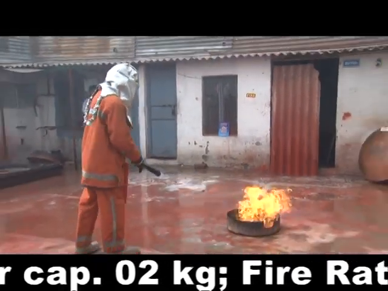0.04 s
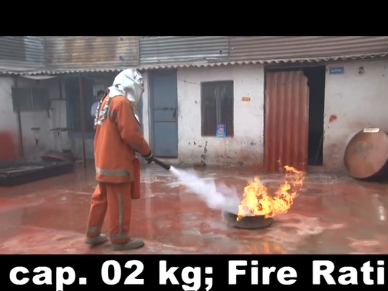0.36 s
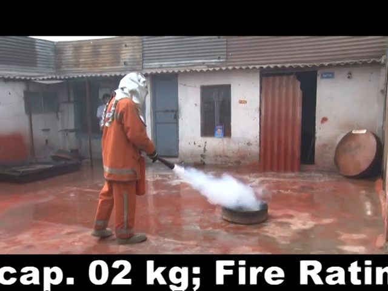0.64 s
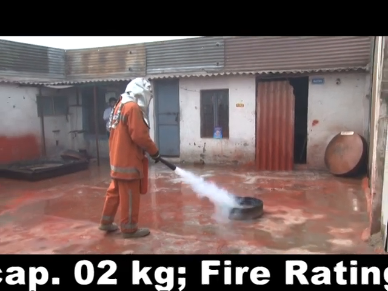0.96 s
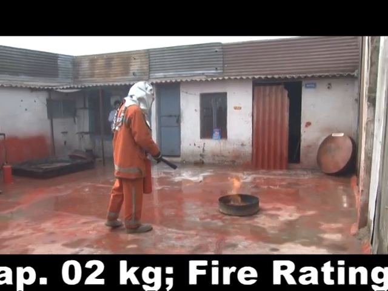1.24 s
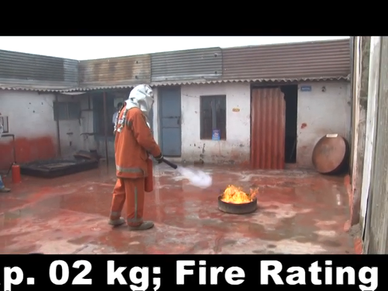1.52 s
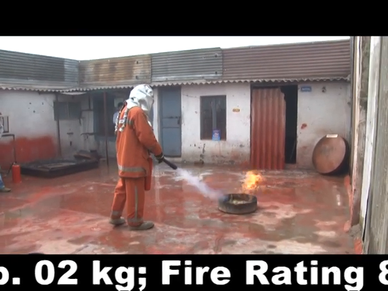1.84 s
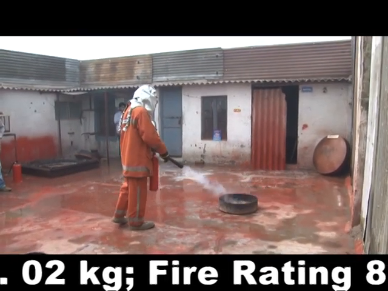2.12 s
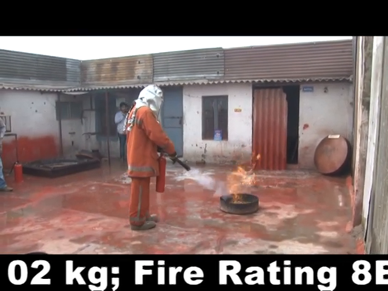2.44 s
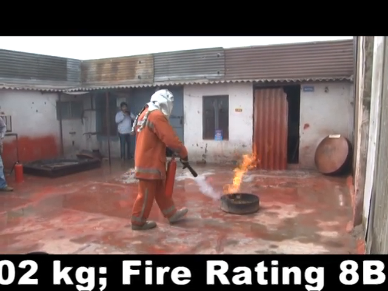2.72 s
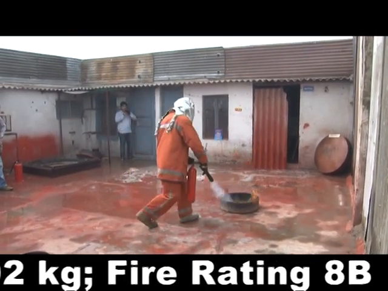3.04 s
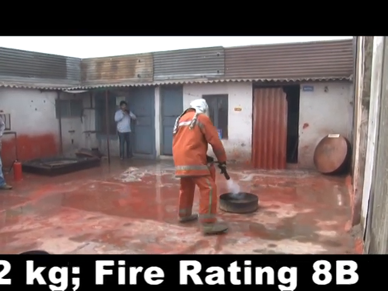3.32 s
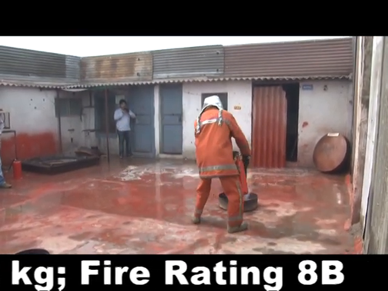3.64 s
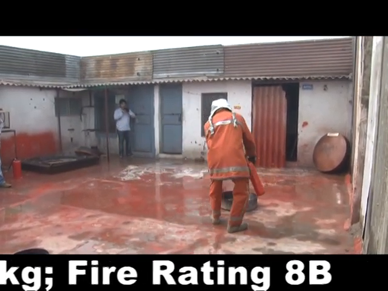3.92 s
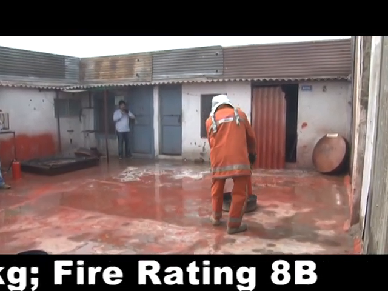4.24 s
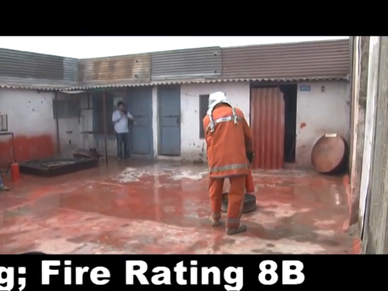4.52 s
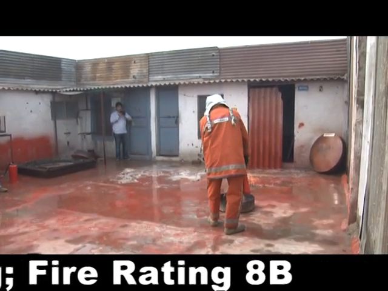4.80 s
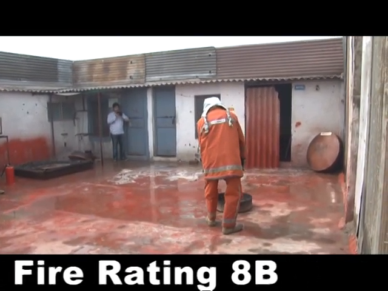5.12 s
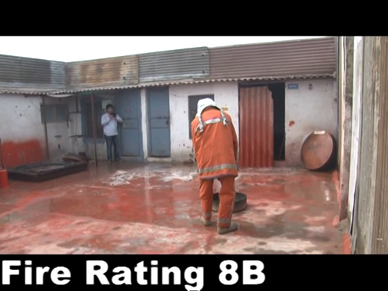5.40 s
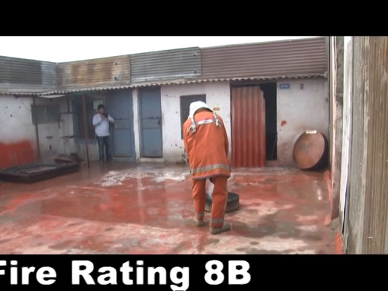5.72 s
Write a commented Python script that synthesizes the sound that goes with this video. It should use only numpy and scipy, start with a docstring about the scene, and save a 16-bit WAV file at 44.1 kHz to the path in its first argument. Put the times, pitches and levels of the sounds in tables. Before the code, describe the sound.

A fire extinguisher's hissing burst dies away with a small lever tick. A second burst roars and booms into a burning pan, stopping as the flames softly flare. Sharp snaps of dry ice surround the start of one long blast, which howls, sputters and then thins to a steady hiss with a deep, hollow thrum beneath. The sound stands near the centre, with a short echo from a walled yard.

```python
"""A carbon dioxide extinguisher is emptied onto a burning pan in a walled yard that echoes. A first burst
dies away and the lever ticks. A second burst roars through the horn and booms in the pan; the flames
rumble under it and flare up when it stops. Lumps of dry ice snap out as one long blast begins. The jet
howls for about a second and sputters, then thins from snow to a hiss of plain gas, while a deep thrum
grows as the horn is brought close to the pan."""
import sys
import numpy as np
from scipy import signal
from scipy.fft import rfft, irfft, next_fast_len
from scipy.io import wavfile
from scipy.ndimage import map_coordinates

SR = 44100
rng = np.random.default_rng(int(sys.argv[2]) if len(sys.argv) > 2 else 0)


def put_to_file(sound):
    """Save the sound as 16-bit audio at rate SR, in the file named by the first command-line argument."""
    columns = np.atleast_2d(sound).T  # one column per channel
    safe = np.clip(columns, -1, 1)
    whole_steps = np.round(safe * 32767)
    wavfile.write(sys.argv[1], SR, whole_steps.astype(np.int16))


N = 262836
LEAD = SR // 3  # extra samples before time zero: the first burst is already under way
TIME = np.arange(-LEAD, N) / SR
M = len(TIME)

# squeezes of the lever: open_s, shut_s, level_db, closing_s
BURSTS = [(-.3, .0, -2, .025), (.329, 1.19, 0, .005), (1.586, 6.5, 0, .005)]
# brief surges of the flow: time_s, gain_db, half_length_s
SURGES = [(0.335, 7, 0.0085), (0.368, 5, 0.0072), (0.583, 3.5, 0.0062), (1.19, 2.5, 0.0096),
          (1.592, 8, 0.015)]
# the liquid runs out and the jet turns from snow to gas: start_s, end_s
EMPTYING_S = (1.28, 3.413)
# resonances of the snowy horn, the gas-filled horn and the pan: pitch_hz, width_hz, lift_db
SNOW_RESONANCES = [(632, 112, 15.5), (858, 81, 9), (1141.7, 75.6, 9.5), (1280.2, 76.6, 11), (1456, 98, 7.5),
                   (1835, 220, 12), (2090.6, 37, 9), (2396, 130, 9), (2660, 68, 5), (2861, 170, 6)]
GAS_RESONANCES = [(634.7, 95, 19.1), (1045, 132, 12.9), (1433, 204, 11.68), (1828, 170, 7.4),
                  (2330, 402, 4.7)]
PAN_RESONANCES = [(461, 58, 14), (663, 149, 17), (1150, 110, 13), (1824, 120, 15), (2300, 160, 16.5)]
# tone colour of the roar in each of those three: pitch_hz, level_db
SNOW_ROAR = [(100, -22), (220, -22.5), (380, -12.5), (520, -9.5), (1000, -7), (2000, -2.5), (3000, 1),
             (4000, -1.5), (7000, -37)]
GAS_ROAR = [(100, -36), (200, -27.5), (450, -22.5), (850, -14.5), (1250, -11.5), (2000, -3), (2800, 0.5),
            (4000, -7), (7000, -55.5)]
PAN_ROAR = [(250, -15), (450, -4), (2400, 0), (3500, -36)]
# the lowest gas resonance fades for a moment: time_s, half_length_s, share_lost
NOTE_FADE = (3.62, 0.39, 0.76)
# tone colour of the jet's hiss, finest spray and deep thrum: pitch_hz, level_db
HISS_COLOUR = [(1000, -37.5), (2400, -7.5), (3500, 0), (4300, 1), (5600, 0), (6600, -4.5), (8000, -12.5),
               (12000, -54)]
SIZZLE_COLOUR = [(3500, -57), (6000, 1.5), (7200, 0.5), (8800, 0), (10000, -5.5), (12000, -13),
                 (13800, -20), (14500, -27.5)]
THRUM_COLOUR = [(150, -35), (215, -9.5), (255, 0), (295, -2), (345, -17.5), (480, -39)]
# the jet brightens as the last liquid leaves: time_s, half_length_s, hiss_db, sizzle_db
CREST = (2.42, 0.438, 1.24, 3.82)
# short swells of the hiss: time_s, gain_db
SPUTTERS = [(2.29, 1), (2.44, 3.5), (2.6, 3.5), (2.69, 5.5), (2.8, 4.5)]
# the horn is swung about: time_s, half_length_s, sizzle_db, roar_db
SWINGS = [(.02, 0.096, -10.5, 4.5), (0.425, 0.089, 3, 0.5), (0.667, 0.0772, -16, 0), (0.884, 0.1, 2, -1.5),
          (1.095, 0.13, -5, 2), (3.188, 0.32, 0, 2.5), (3.897, 0.35, -1.7, -0.93)]
# the jet locks onto a note of the horn: start_s, end_s
HOWL_LOCKS = [(1.768, 1.909), (2.003, 2), (2.1, 2.215), (2.265, 2.3)]
# the note hovers loosely all through this time: start_s, end_s
HOWL_SPAN_S = (1.68, 2.587)
# whistles at the mouth of the horn: time_s, half_length_s, pitch_hz, width_hz, level_db
WHISTLES = [(0.335, 0.023, 2600, 800, -19.5), (0.66, 0.17, 2320, 110, -27), (2.231, 0.33, 1840, 94, -29),
            (2.627, 0.11, 4160, 650, -20), (2.68, 0.276, 5440, 300, -26), (3.097, 0.099, 1830, 111, -26.5),
            (4.238, 0.16, 1845, 130, -29.5)]
# the jet aimed straight into the pan: start_s, end_s, level_db, rise_s, fall_s
INTO_PAN = (0.62, 0.8284, -20, 0.16, 0.0045)
# the horn is carried up to the pan: start_s, end_s
WALK_S = (2.04, 4.0)
# lumps of dry ice leaving the horn: start_s, snap_db, crack_db, decay_s
ICE_LUMPS = [(1.339, -14.5, -26.5, 0.0057), (1.361, -35.5, -54, 0.053), (1.559, -8, -18, 0.0072),
             (1.796, -7, -26, 0.0045), (2.046, -9, -16, 0.0066)]
# the lever hits its stop: start_s, level_db
LEVER_TICK = (.126, -36)
# the jet blows the flames about: start_s, end_s, level_db
FLARES = [(.08, 0.178, -35), (0.513, .88, -35), (1.025, 1.17, -33), (1.736, 2.244, -41.5)]
# the fuel catches again: start_s, level_db, decay_s
FLARE_UP = (1.26, -33, 0.055)
# tone colour of the fire and of the outdoor air: pitch_hz, level_db
FIRE_COLOUR = [(15, -27), (35, 1), (60, 4.5), (105, 7.5), (150, 2.5), (205, -10), (275, -3.5), (500, -36.5)]
AIR_COLOUR = [(30, -18), (120, -8), (300, 1.5), (700, -2), (1800, -9.5), (4000, -21.5), (8000, -34),
              (13000, -65)]
# how long the echo takes to fall by 60 dB: pitch_hz, decay_s
ECHO_DECAY = [(150, 0.68), (600, 0.6), (2000, 0.491), (4500, 0.453), (9000, 0.31), (14000, 0.288)]
# where the jet stands: time_s, left_minus_right_db
JET_PLACE = [(.35, -1.2), (.75, 0.12), (1.75, 1.6), (2.25, -0.8), (3.2, .1), (3.75, -1.3), (5.8, -.3)]
# how alike left and right are: pitch_hz, likeness (1 is identical)
STEREO_LIKENESS = [(100, 0.935), (650, 0.9), (950, 0.59), (1500, 0.538), (2100, 0.64), (2900, 0.665),
                   (3900, 0.722), (6000, 0.79), (7600, .6), (9000, 0.88), (11500, 0.99)]
# which side is louder: pitch_hz, left_minus_right_db
STEREO_LEAN = [(600, -0.2), (950, 3.5), (1800, 0.2), (2900, 1), (4000, -1), (7000, 0.2), (8200, -1.5),
               (11000, 0)]
# which side is ahead: pitch_hz, left_lead_radians
STEREO_PHASE = [(0, 0), (1030, 0.26), (1290, 0.8), (1810, 0.53), (2330, -0.64), (2840, -0.67), (4130, 0.32),
                (4570, -0.38), (7240, -0.41), (7580, -0.82), (8270, -0.25), (9220, -0.77), (10400, -0.0),
                (14300, -0.0)]


def jet():
    """Large swirls roar in the horn, small ones hiss and sizzle at its mouth; all flutter together."""
    hiss_db, sizzle_db = treble_levels()
    _, roar_swing_db = swings()
    roar = amp(roar_swing_db + 0.425 * wobble(40)) * horn()
    hiss = amp(hiss_db + 0.71 * wobble(35)) * rush(HISS_COLOUR)
    sizzle = amp(sizzle_db + 0.87 * wobble(50)) * rush(SIZZLE_COLOUR)
    flutter = amp(0.51 * wobble(21.98) + 0.84 * wobble(140))
    return valve() * flutter * (roar + hiss + sizzle + pan() + thrum() + whistles())


def valve(opening_s=0.0046):
    """The valve opens within milliseconds, and the flow surges when liquid reaches the nozzle."""
    flow = 0
    for open_s, shut_s, db, closing_s in BURSTS:
        opened = .5 + .5 * np.tanh((TIME - open_s) / (2 * opening_s))
        flow += amp(db) * opened * np.exp(-np.maximum(TIME - shut_s, 0) / closing_s)
    return flow * amp(sum(db * bell(s, half) for s, db, half in SURGES))


def horn(snow_db=-18, gas_db=-22):
    """Rushing gas rings the horn, whose resonances change as the snow in it clears."""
    snow = np.interp(TIME, EMPTYING_S, (1, 0)) ** 1.8  # clears quickly at first
    time_s, half_s, share_lost = NOTE_FADE
    faded = share_lost * bell(time_s, half_s)
    gas_roar = np.sqrt(1 - faded) * rush(GAS_ROAR, GAS_RESONANCES)
    gas_roar += np.sqrt(faded) * rush(GAS_ROAR, GAS_RESONANCES[1:])
    snow_roar = rush(SNOW_ROAR, SNOW_RESONANCES)
    return amp(snow_db) * np.sqrt(snow) * snow_roar + amp(gas_db) * np.sqrt(1 - snow) * gas_roar


def treble_levels(hiss_sag_db_per_s=0.38, sizzle_sag_db_per_s=3):
    """Hiss and sizzle in dB: they grow as snow turns to gas, then sag as the pressure falls."""
    gas = np.interp(TIME, EMPTYING_S, (0, 1))
    gas_only_s = np.maximum(TIME - EMPTYING_S[1], 0)
    crest_s, half_s, crest_hiss_db, crest_sizzle_db = CREST
    crest = bell(crest_s, half_s)
    swing_db, _ = swings()
    sputter_db = sum(db * bell(s, half_s=0.038) for s, db in SPUTTERS)
    hiss_db = blend(-21.5, -17.5, gas) + crest_hiss_db * crest - hiss_sag_db_per_s * gas_only_s
    sizzle_db = blend(-27, -21.5, gas) + crest_sizzle_db * crest - sizzle_sag_db_per_s * gas_only_s
    return hiss_db + 0.44 * swing_db + sputter_db, sizzle_db + swing_db + .4 * sputter_db


def swings():
    """How much the sizzle and the roar change, in dB, as the horn turns."""
    shapes = np.array([bell(s, half) for s, half, _, _ in SWINGS])
    return np.transpose(SWINGS)[2:] @ shapes


def howl(pitch_hz=563, rise_hz_per_s=67, loose_db=-32, locked_db=-21.5):
    """A note of the horn rises as the snow thins, louder and steadier when the jet locks onto it."""
    lock = np.max([held(start, end, rise_s=0.0096, fall_s=0.013) for start, end in HOWL_LOCKS], axis=0)
    hz = pitch_hz + rise_hz_per_s * (TIME - HOWL_SPAN_S[0])
    waver_hz = blend(34, 6, lock) * wobble(110)
    phase = 2 * np.pi * np.cumsum(hz + waver_hz) / SR
    level = held(*HOWL_SPAN_S, rise_s=0.034, fall_s=0.18) * amp(blend(loose_db, locked_db, lock))
    flutter = amp(blend(4.5, 2.6, lock) * np.tanh(wobble(80)) + wobble(90))
    overtone = amp(-20 + 4 * wobble(60)) * np.sin(3 * phase)
    return level * np.sqrt(2) * (flutter * np.sin(phase) + overtone)


def whistles():
    """Each breathy whistle is a narrow band of rushing noise that swells and fades."""
    sound = 0
    for s, half, pitch, width, db in WHISTLES:
        band = filtered(rng.standard_normal(M), lambda hz: 1 / (1 + (2 * (hz - pitch) / width) ** 4))
        sound += amp(db) * bell(s, half) * unit(band)
    return sound


def pan():
    """The pan booms while the jet blows into it."""
    start, end, db, rise, fall = INTO_PAN
    return amp(db) * held(start, end, rise, fall) * rush(PAN_ROAR, PAN_RESONANCES)


def thrum(far_db=-50, near_db=-43):
    """A deep, hollow note under the hiss grows as the horn nears the pan."""
    return amp(np.interp(TIME, WALK_S, (far_db, near_db))) * rush(THRUM_COLOUR)


def dry_ice(bounce_s=.0068):
    """Each lump leaves with a hollow snap and a thin crack, echoed by the wet ground."""
    snaps = 0
    for s, snap_db, crack_db, decay_s in ICE_LUMPS:
        snaps += amp(snap_db) * puff(s, decay_s, band_hz=(815, 1910))
        snaps += amp(crack_db) * puff(s, decay_s, band_hz=(2300, 6700))
    return snaps + amp(-7) * np.interp(TIME - bounce_s, TIME, snaps)


def lever():
    """The released lever ticks against its stop."""
    start_s, db = LEVER_TICK
    return amp(db) * puff(start_s, decay_s=0.0027, band_hz=(1500, 8100))


def flames(draught_db=-57.5, growth_db_per_s=1.23):
    """The fire rumbles in the jet and the stirred air, and catches again with a soft whoomp."""
    flares = np.max([amp(db) * held(start, end, rise_s=0.05, fall_s=0.201)
                     for start, end, db in FLARES], axis=0)
    draught = amp(draught_db + growth_db_per_s * TIME)
    rumble = np.hypot(flares, draught) * amp(2.1 * wobble(12)) * rush(FIRE_COLOUR)
    start_s, whoomp_db, decay_s = FLARE_UP
    return rumble + amp(whoomp_db) * puff(start_s, decay_s, band_hz=(170, 440))


def yard(sound, stretch=SR // 4):
    """The horn keeps moving, so each stretch of its sound gets a new echo from the walls."""
    echoes = np.zeros((2, M + SR))
    for start in range(0, M, stretch):
        echo = signal.fftconvolve(sound[None, start:start + stretch], wall_echo(), axes=1)
        echoes[:, start:start + echo.shape[1]] += echo
    return echoes[:, :M]


def wall_echo(build_up_s=0.003):
    """One blurred answer of the walls; its treble dies first."""
    hz, t, spectrum = signal.stft(rng.standard_normal((2, SR // 2)), SR, nperseg=256)
    decay = amp(-60 * t / along(ECHO_DECAY, hz)[:, None]) * np.clip(t / build_up_s, 0, 1)
    pair = spread(signal.istft(spectrum * decay, SR, nperseg=256)[1])
    return pair / np.linalg.norm(pair[0])


def outdoor_air():
    """A faint, low, steady rush fills the yard."""
    return amp(-46) * rush(AIR_COLOUR)


def stereo_tint(sound):
    """Make left and right differ slightly in tone colour and timing."""
    sides = np.array([[.5], [-.5]])
    lean = lambda hz: amp(sides * along(STEREO_LEAN, hz))
    return filtered(sound, lambda hz: lean(hz) * np.exp(1j * sides * along(STEREO_PHASE, hz)))


def rush(colour, resonances=()):
    """Stereo rushing noise of strength 1, lifted at each resonance."""
    def gain(hz):
        lift_db = sum(db / (1 + (2 * (hz - pitch) / width) ** 2) for pitch, width, db in resonances)
        return amp(along(colour, hz) + lift_db)
    return unit(spread(rng.standard_normal((2, M)), gain))


def puff(start_s, decay_s, band_hz):
    """A band of noise that starts suddenly and dies away."""
    age = TIME - start_s
    band = signal.butter(3, band_hz, "band", fs=SR, output="sos")
    noise = rng.standard_normal(M)
    envelope = (age >= 0) * np.exp(-np.abs(age) / decay_s) + 1e-9
    return signal.sosfilt(band, noise * envelope) / np.std(signal.sosfilt(band, noise))


def spread(pair, gain=np.ones_like):
    """Mix two unrelated signals into a left and a right that are partly alike."""
    def weights(hz):
        angle = np.arccos(along(STEREO_LIKENESS, hz)) / 2
        return gain(hz) * np.array([np.cos(angle), np.sin(angle)])
    mid, side = filtered(pair, weights)
    return np.array([mid + side, mid - side])


def filtered(x, gain):
    """Multiply each frequency in x by gain(hz)."""
    n = x.shape[-1]
    padded = next_fast_len(n + 8192)
    return irfft(rfft(x, padded) * gain(np.fft.rfftfreq(padded, 1 / SR)), padded)[..., :n]


def wobble(rate):
    """A smooth curve through `rate` random points a second."""
    points = rng.standard_normal(int(M * rate / SR) + 4)
    return map_coordinates(points, [np.arange(M) * rate / SR])


def bell(time_s, half_s):
    """A smooth swell from 0 to 1 and back."""
    return np.exp(-((TIME - time_s) / half_s) ** 2)


def held(start_s, end_s, rise_s, fall_s):
    """Rise to 1 by the start, hold until the end, then fade."""
    return np.exp(-(np.minimum(TIME - start_s, 0) / rise_s) ** 2 - np.maximum(TIME - end_s, 0) / fall_s)


def along(table, hz):
    """Read between the rows of a table, on a log pitch scale."""
    pitches, values = np.transpose(table)
    return np.interp(np.log(hz + 1), np.log(pitches + 1), values)


def blend(a, b, share):
    """From a to b as share goes from 0 to 1."""
    return a + (b - a) * share


def amp(db):
    """Turn decibels into a gain."""
    return 10 ** (np.asarray(db) / 20)


def unit(x):
    """Scale to an average strength (rms) of 1."""
    return x / np.sqrt(np.mean(x ** 2) + 1e-20)


def scene():
    """The extinguisher and the fire in the yard, over faint outdoor air."""
    spray, note, knocks = jet(), howl(), dry_ice() + lever()
    walls = yard(amp(-6) * spray.mean(axis=0) + amp(-11) * note + amp(-20) * knocks)
    place_db = np.interp(TIME, *np.transpose(JET_PLACE))
    extinguisher = (spray + note + knocks + walls) * amp(np.outer([.5, -.5], place_db))
    return stereo_tint(extinguisher + flames() + outdoor_air())[:, LEAD:]


def record(dry):
    """Round off the tallest peaks and cut everything above 14400 Hz."""
    rounded = dry / (1 + np.abs(dry) ** 8) ** (1 / 8)
    return filtered(rounded, lambda hz: hz < 14400)


dry = scene()
out = record(dry)
put_to_file(out)
```